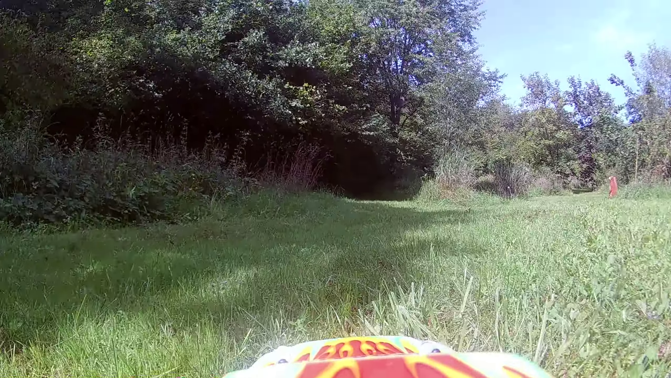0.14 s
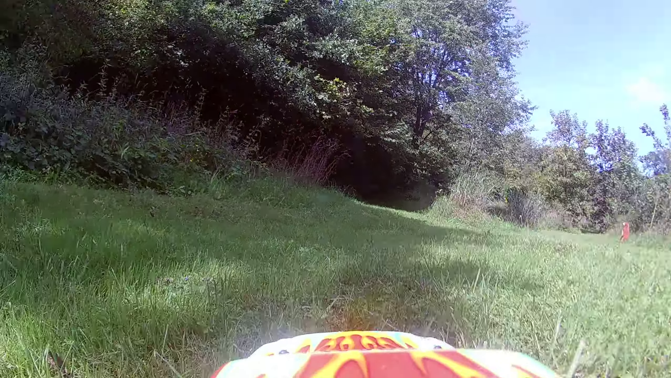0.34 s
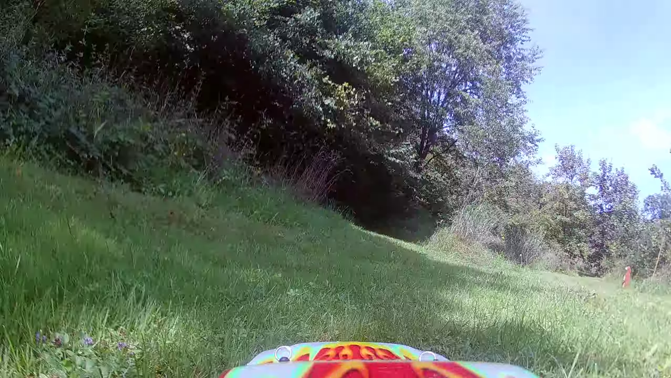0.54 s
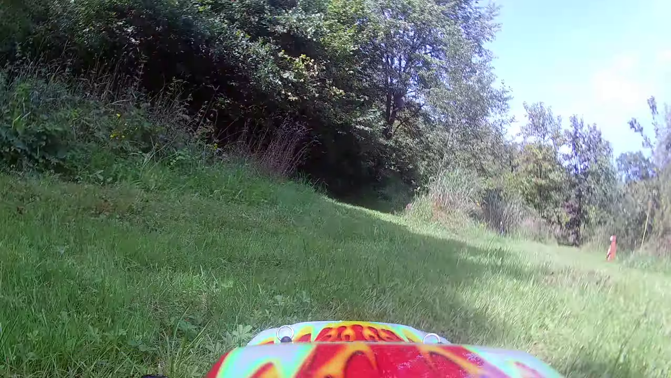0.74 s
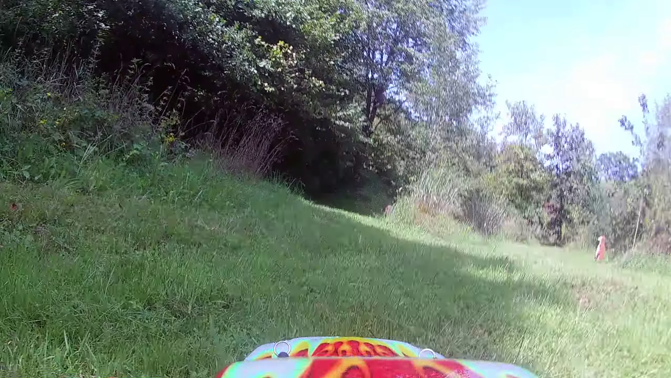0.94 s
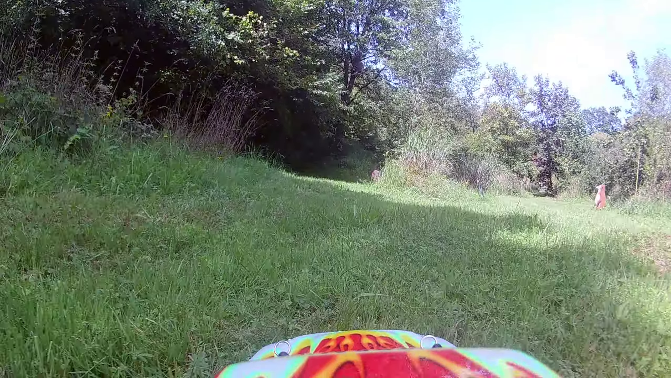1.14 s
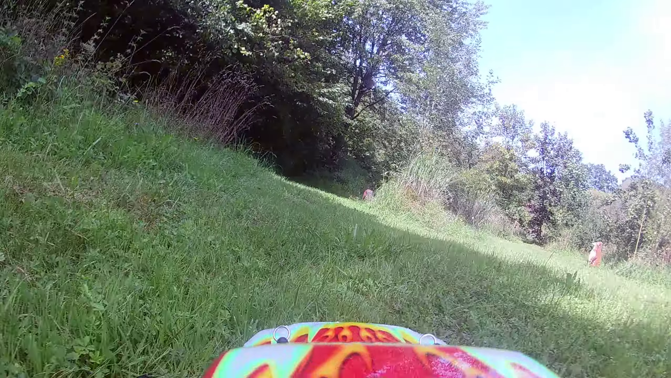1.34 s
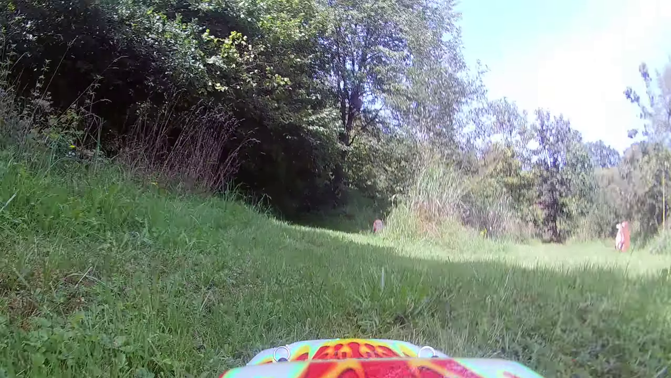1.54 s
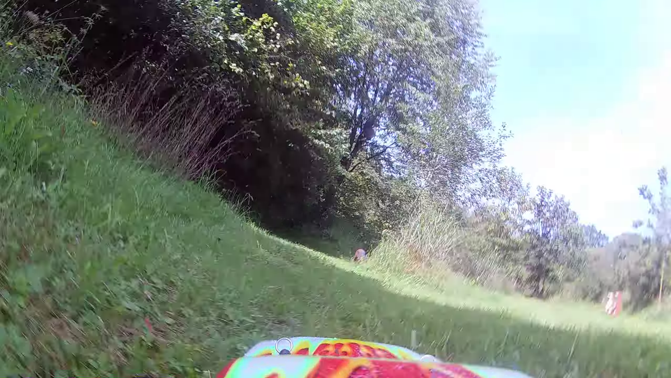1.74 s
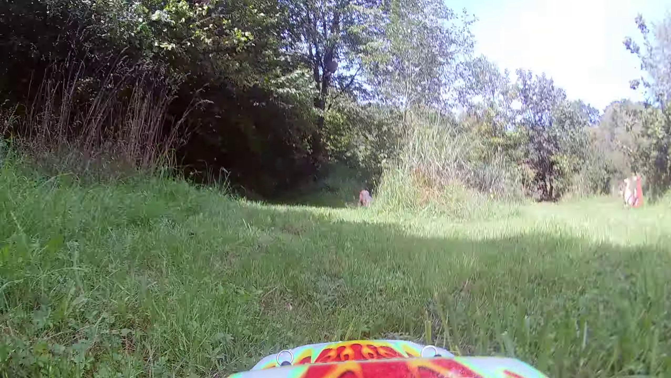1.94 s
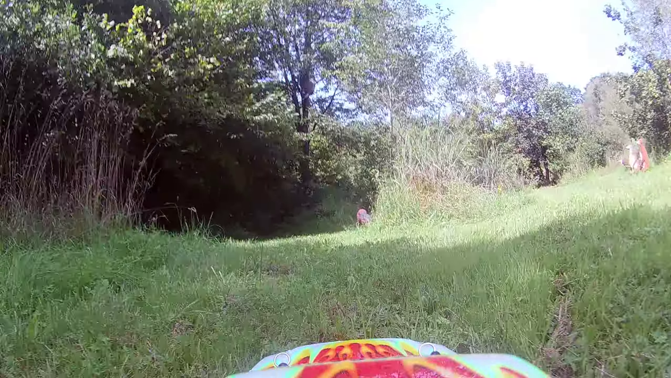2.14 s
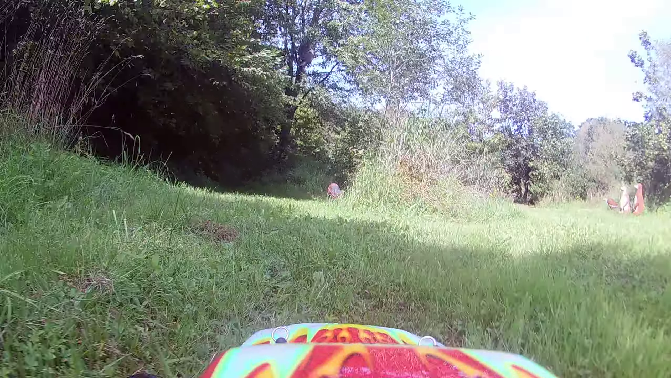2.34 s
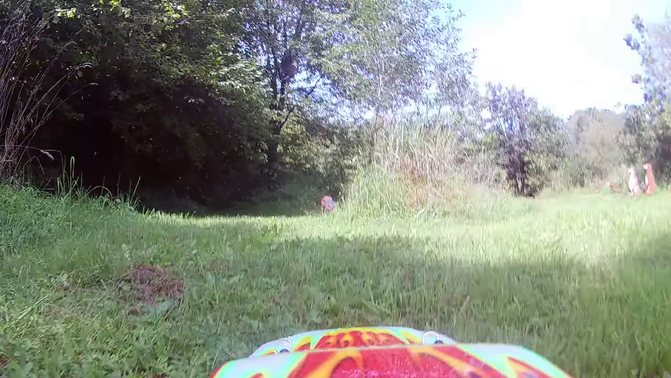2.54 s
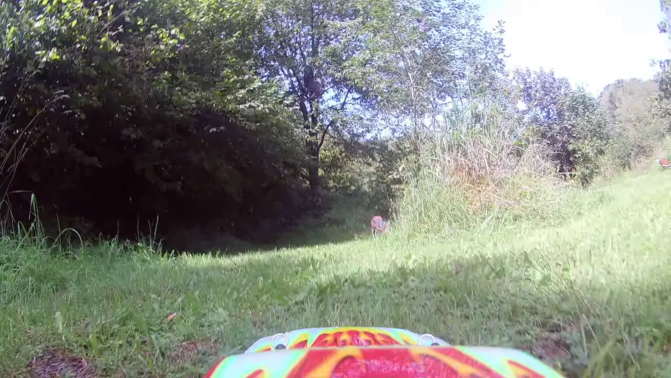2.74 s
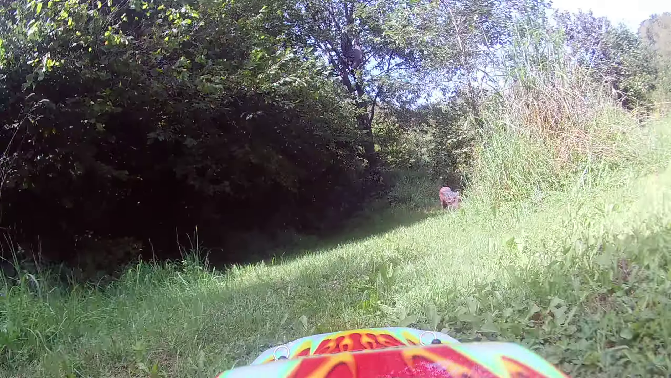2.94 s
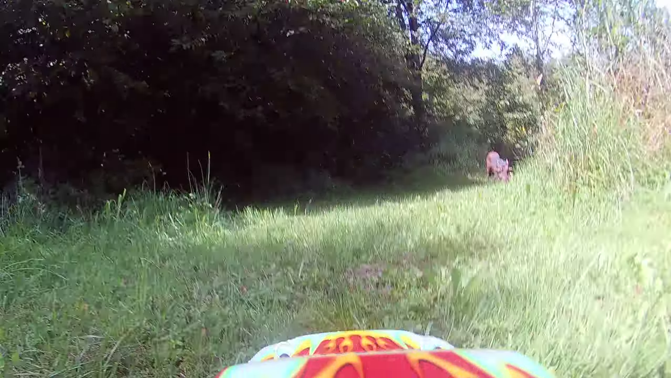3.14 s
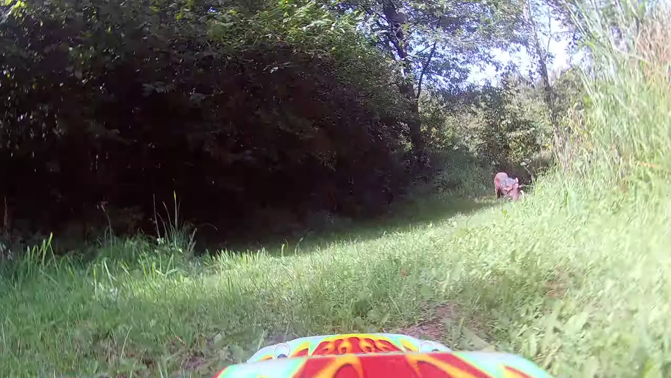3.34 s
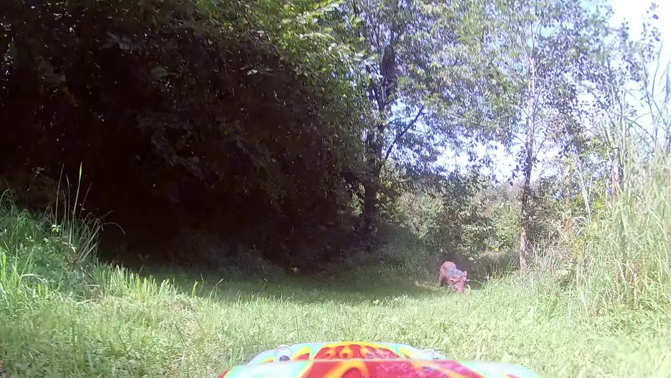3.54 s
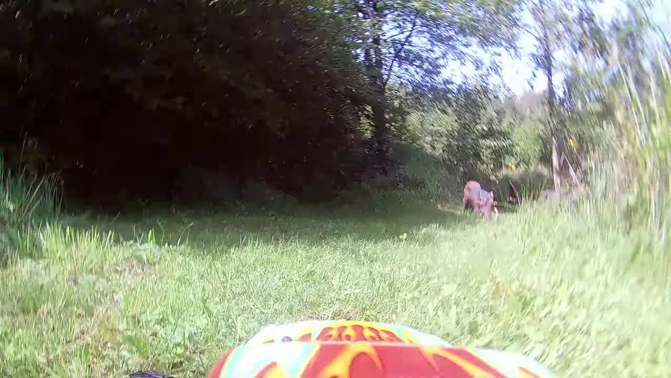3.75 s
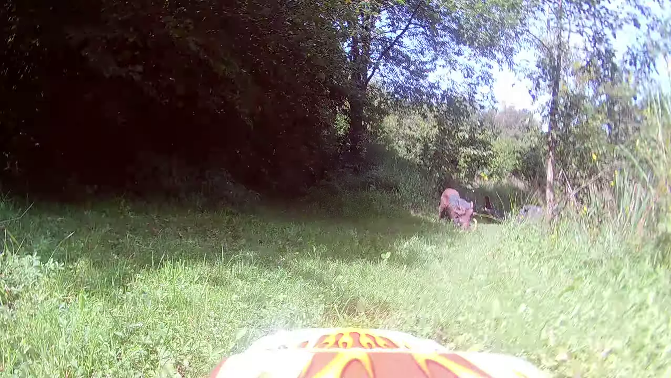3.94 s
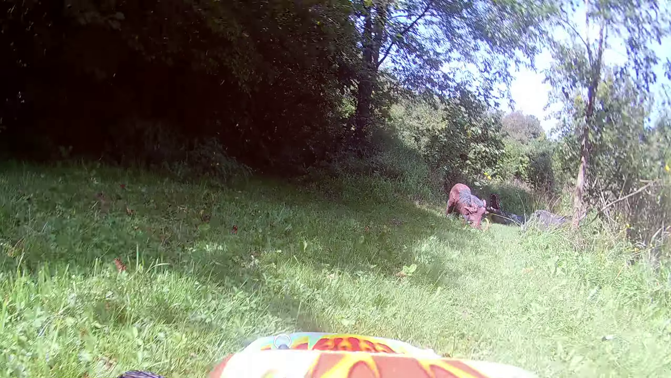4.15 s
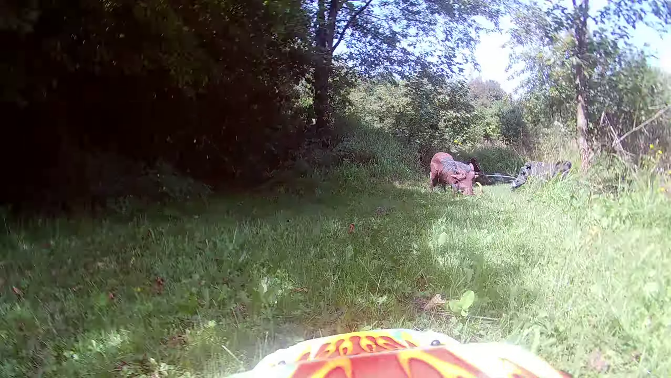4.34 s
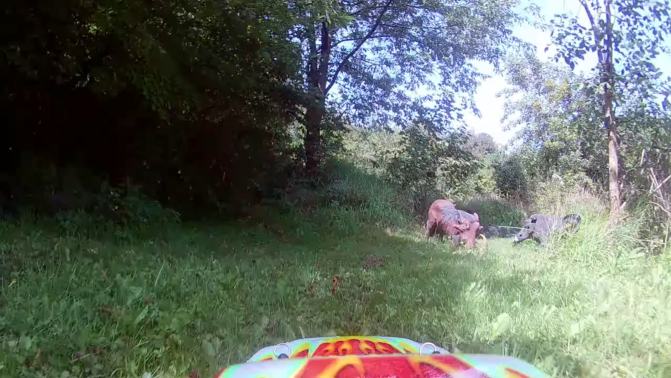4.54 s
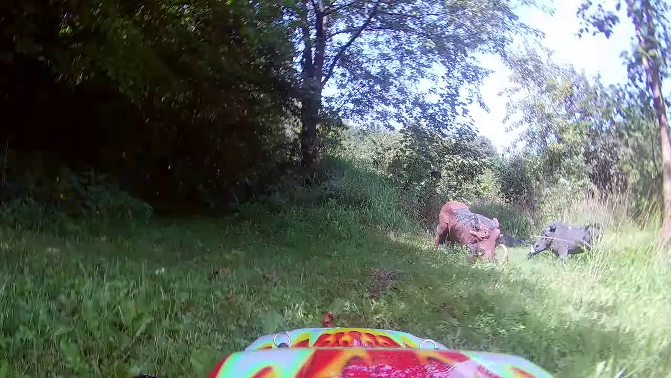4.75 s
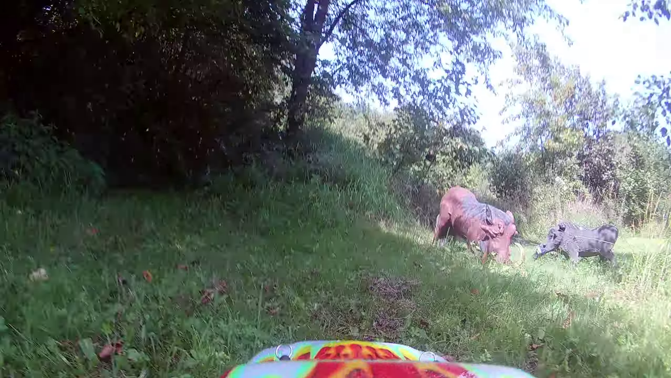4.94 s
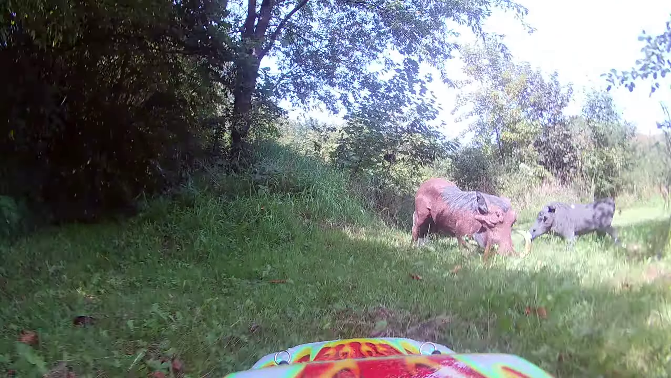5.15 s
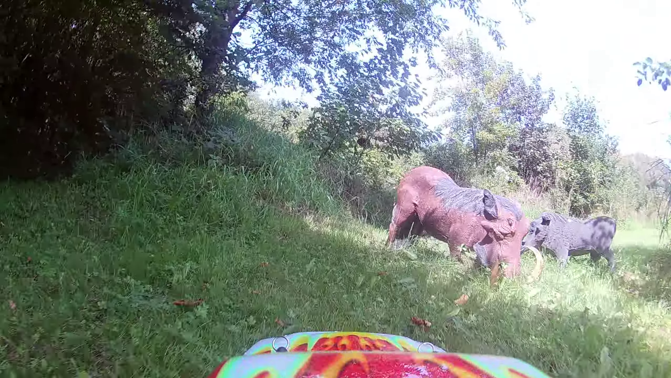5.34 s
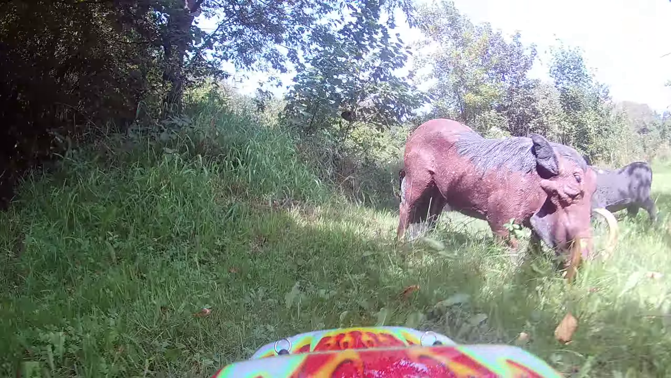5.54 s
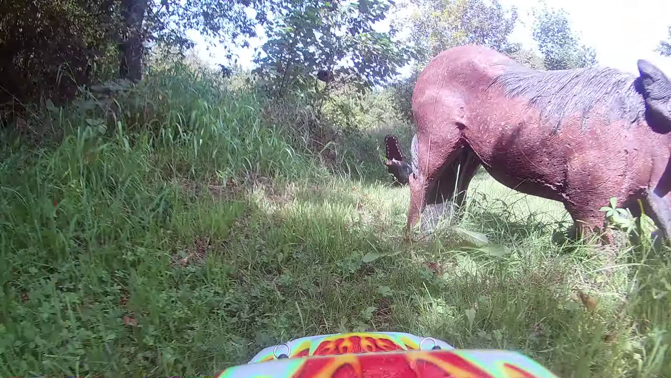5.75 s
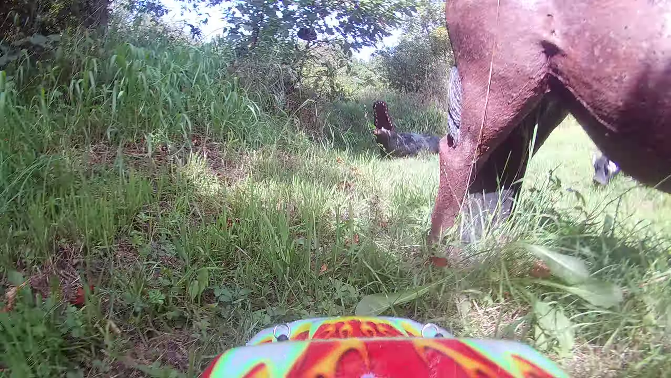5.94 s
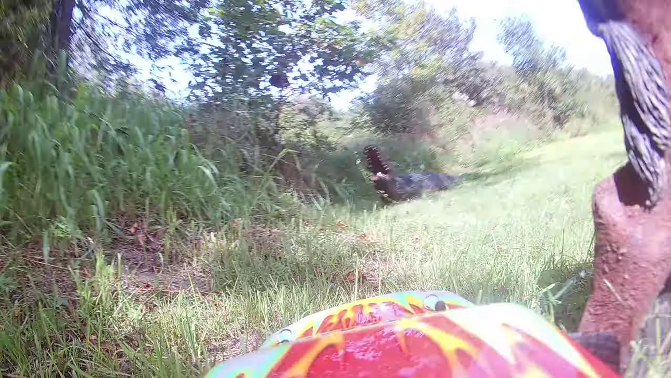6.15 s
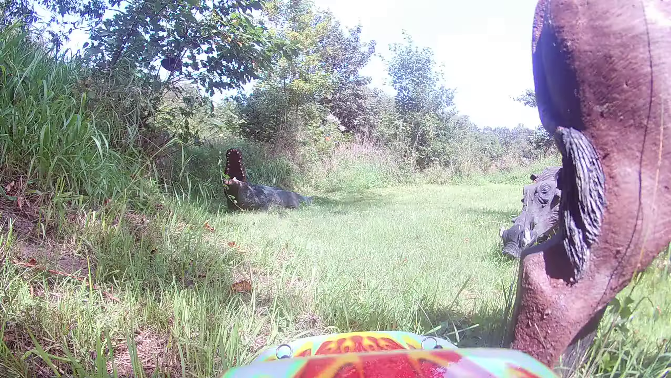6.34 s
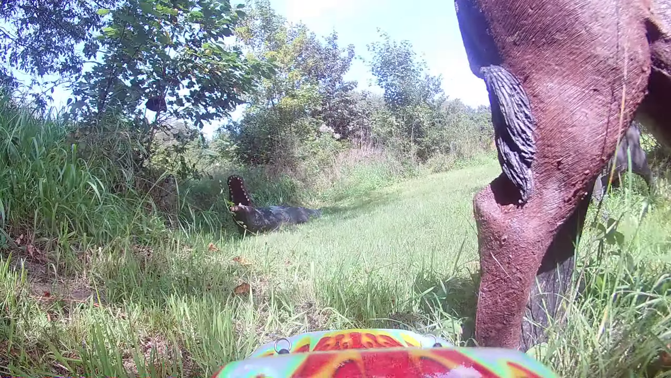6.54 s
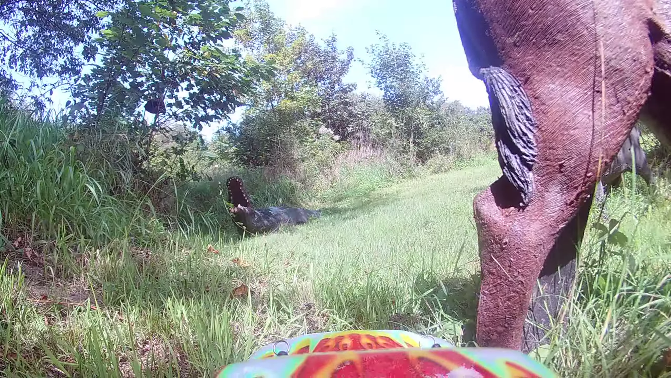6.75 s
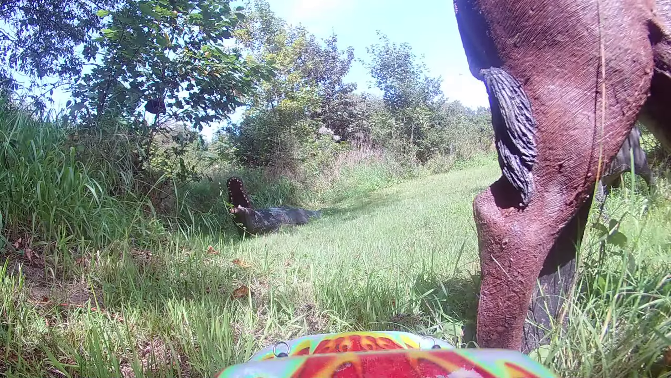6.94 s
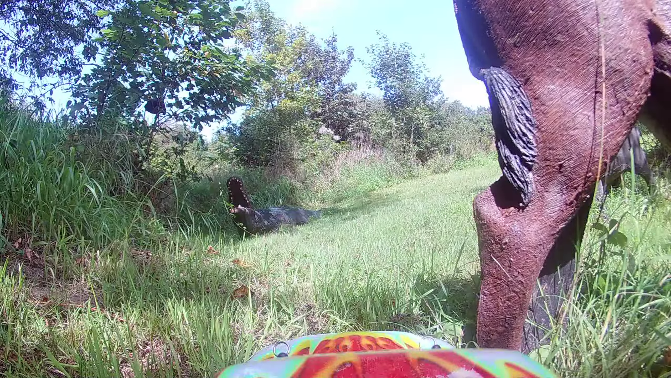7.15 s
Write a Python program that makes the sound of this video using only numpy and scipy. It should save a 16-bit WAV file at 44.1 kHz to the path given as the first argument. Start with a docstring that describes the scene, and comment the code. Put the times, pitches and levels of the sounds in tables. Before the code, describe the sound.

A toy truck bounces through long grass, its plastic shell knocking and crackling above pattering stems and whining gears, until it halts.

```python
"""Knocks on the plastic shell of a small radio-controlled truck lead as it drives through long grass and stops.
Each knock sums a flexing thud, a panel snap, a burst of overload crackle and ringing modes.
Grass stems patter and swish as random grains; bumps excite a damped chassis bounce.
The gears whine at their tooth rate, with faint high whistles and still air behind.
The highest peaks are rounded by overload, and the microphone's closed case cuts two dips in the treble."""
import sys
import numpy as np
from scipy import signal
from scipy.fft import rfft, irfft
from scipy.io import wavfile
from scipy.ndimage import uniform_filter1d

SR = 44100
rng = np.random.default_rng(int(sys.argv[2]) if len(sys.argv) > 2 else 0)


def master_out(mix):
    """Clip the mix to full scale and print it as 16-bit PCM to the path in sys.argv[1]."""
    frames = np.transpose(np.atleast_2d(mix))
    ceiling = np.clip(frames, -1, 1)
    pcm = np.round(ceiling * 32767).astype(np.int16)
    wavfile.write(sys.argv[1], SR, pcm)


N = 321914
TIME = np.arange(N) / SR
TAPS = 4096  # length of an impulse response or a blow, in samples
TAP_HZ = np.fft.rfftfreq(TAPS, 1 / SR)
TAP_TIME = np.arange(TAPS) / SR

# All table levels are relative: the functions add their own offsets.
# Single knocks on the shell, hard to faint: start_s [s], thud_db [dB], thud_hz [Hz], clack_db [dB]
KNOCKS = [(.069, -8, 685, -20), (.228, -11, 730, -7.5), (.258, -14, 640, -36), (0.381, -24, 700, -17.5),
          (.424, -0.5, 674, -2.5), (.518, -1, 738, -4), (.535, -6, 580, -14), (0.572, -12, 620, -25),
          (.593, -13.5, 570, -13.5), (.601, -3.5, 520, -7), (.705, -8.5, 740, -17.5), (.773, 2.5, 542, -3),
          (.854, -8, 705, -3), (.884, -13, 570, -9.5), (0.991, -8.5, 530, -10.5), (1.154, -15, 840, -17),
          (1.227, -8, 800, -8), (1.328, -3.5, 720, -7.5), (1.379, -11, 690, -17), (1.448, -9, 606, -19),
          (1.471, -12.5, 630, -29), (1.492, -11, 537, -5), (1.507, -7, 770, -14), (1.542, -3, 600, -1.5),
          (1.729, 2.5, 635, -2), (1.746, -1.5, 490, -13), (1.772, 5.5, 540, -7), (1.826, -21.5, 620, -6),
          (1.904, -9, 785, -20), (2.0, -7.5, 674, -13), (2.057, -12, 706, -17), (2.158, -13.5, 715, -8.5),
          (2.265, -13, 652, -11), (2.318, -12.5, 664, -1), (2.336, -0.5, 474, -7.5), (2.358, -3, 654, -33),
          (2.425, -9, 667, -15), (2.524, -9, 740, -18), (2.583, -6.5, 646, 2.5), (2.618, 0, 650, -1),
          (2.639, -15, 714, -8.5), (2.68, -10.5, 594, -6), (2.737, -10, 480, -7), (2.779, -6.5, 610, -1.5),
          (2.831, -13, 744, -10), (2.911, -18, 670, -9.5), (3.015, -10.5, 637, -10.5),
          (3.08, -6.5, 553, -9), (3.123, -3.5, 620, -5.5), (3.24, -5.5, 670, -8.5), (3.26, -5.5, 700, -10),
          (3.289, 1.5, 604, -1), (3.305, -5.5, 472, -11), (3.326, -10.5, 724, 0), (3.49, -8, 583, -39),
          (3.606, -11, 730, -19.5), (3.687, -3.5, 454, -10), (3.715, -18, 640, -5.5),
          (3.726, -12.5, 610, -7.5), (3.79, -10, 630, -3.5), (3.801, -1, 520, -8), (3.91, -6, 580, -9.5),
          (3.931, -25.5, 740, -8), (3.939, -9, 622, -5.5), (3.955, -13.5, 775, -21.5),
          (3.986, -7, 613, -8.5), (4.088, -9, 723, -9), (4.113, -10.5, 500, -8.5), (4.139, -9.5, 730, -1),
          (4.199, -8, 656, -5.5), (4.279, -11.5, 790, -16), (4.345, -8, 696, -5), (4.363, -6.5, 688, -12),
          (4.387, -5.5, 640, -0.5), (4.407, -8.5, 776, -15.5), (4.641, -18, 705, -11),
          (4.682, -8, 756, -17.5), (4.785, -7.5, 727, -2), (4.812, -4, 570, -21.5), (4.829, -7, 670, -2),
          (4.881, -14, 650, -10), (4.98, -9.5, 700, -22), (5.015, -7.5, 660, -5.5), (5.12, -8, 707, -3.5),
          (5.156, -9, 760, -10), (5.199, -11, 762, -13.5), (5.224, -4, 654, -5.5), (5.301, -8, 670, -11.5),
          (5.445, -1, 670, -1.5), (5.575, -6.5, 685, -7.5), (5.653, -13, 760, -14.5),
          (5.783, -11, 736, -22), (5.836, -22, 645, -19), (5.902, -6, 760, -9.5), (6.019, -8, 703, -10.5),
          (6.028, -19, 578, -8), (6.073, -13.5, 590, -10.5), (6.085, -9.5, 590, -18), (6.132, 2, 635, -8.5),
          (6.156, -12, 694, -23), (6.165, -6, 530, -7), (6.195, -18, 650, -22), (6.213, -9, 724, -4.5),
          (6.244, -8.5, 520, -21.5), (6.293, -9, 600, -10.5), (6.34, -5, 743, -9), (6.362, -13.5, 710, -14),
          (6.4, -18, 804, -17), (6.452, 1, 670, -5), (6.472, 3.5, 486, -9.5), (6.538, -25, 660, -14),
          (6.581, -9, 705, -10.5), (6.609, -39, 690, -25.5), (6.651, -25, 780, -25),
          (6.73, -29.5, 750, -46), (6.766, -28, 760, -31.5), (6.782, -29, 720, -53)]
# The ride through the grass: time_s [s], patter_db [dB], whine_db [dB], swish_db [dB], shaking_db [dB]
DRIVE = [(0, -36, -32, -64, -38), (.36, -30.5, -36, -67.5, -36.5), (.69, -26.5, -30, -56, -32.5),
         (1.25, -30, -30.5, -56.5, -37.5), (1.63, -26.5, -35.5, -54, -31),
         (2.2, -30.5, -26.5, -52.5, -35.5), (2.5, -30.5, -30.5, -51.5, -37),
         (2.73, -23, -30.5, -57.5, -29.5), (2.95, -29, -31, -51.5, -32.5), (3.4, -25, -31.5, -55, -30.5),
         (3.94, -26.5, -32, -54, -28.5), (4.55, -30, -26.5, -54, -33), (4.84, -24.5, -35, -49, -31),
         (5.23, -31, -32, -55.5, -37), (5.55, -26, -25, -54, -35), (5.68, -34.5, -60, -64, -35.5),
         (5.93, -31.5, -35.5, -53, -41), (6.04, -21.5, -29.5, -46.5, -33), (6.2, -29, -47.5, -62, -27.5),
         (6.28, -39, -54.5, -74, -36), (6.52, -33, -44.5, -78.5, -31), (6.64, -58.5, -52, -91.5, -49.5),
         (6.9, -72, -77, -90, -70)]
# Road speed as the tooth rate of the gears: time_s [s], tooth_rate_hz [Hz]
TOOTH_RATE = [(0, 964), (.3, 1008), (.7, 1371), (1.1, 1255), (1.4, 1384), (2.2, 1538), (2.9, 1430),
              (3.3, 1516), (4.2, 1453), (4.9, 1588), (5.3, 1489), (5.58, 1580), (5.8, 1320), (6.05, 1526),
              (6.2, 1460), (6.6, 588)]
# Spectrum of a snapping panel: frequency_hz [Hz], level_db [dB per Hz]
CLACK_SPECTRUM = [(200, -19), (700, -7.5), (1100, 7), (1850, 6), (2150, -3.5), (2700, -7), (3050, -26.5),
                  (3900, -21), (5000, -30), (7000, -40.5), (12000, -59), (16000, -61)]
# Treble spectrum of swishing stems and of overload crackle: frequency_hz [Hz], level_db [dB per Hz]
SWISH_SPECTRUM = [(1200, -18), (2400, 14.5), (3200, -4), (3900, 0), (4800, -15.5), (5600, -1), (6300, -20),
                  (7100, -9.5), (9000, -28), (10500, -28.5), (13000, -26), (14200, -26.5), (16000, -32)]

CHANCE_END_S = 5.5  # random light knocks and ruts end here
CRACKLE_LEAD_S = .03  # the crackle swells from this long before a blow


def amp(db):
    """Level law: decibels to amplitude gain."""
    return 10 ** (np.asarray(db) / 20)


def unit(x):
    """Power normalization: scales to rms 1."""
    return x / np.sqrt(np.mean(x ** 2) + 1e-20)


def unit_peak(x):
    """Peak normalization: scales to peak magnitude 1."""
    return x / abs(x).max()


def curve(table, axis=1):
    """Linear interpolation of one table column over time."""
    columns = np.transpose(table)
    return np.interp(TIME, columns[0], columns[axis])


def spectrum_db(points, hz):
    """Interpolates a spectrum in decibels on a logarithmic frequency axis."""
    f, db = np.transpose(points)
    return np.interp(np.log(hz + 1), np.log(f + 1), db)


def noise(points, size=N):
    """Spectral shaping: white noise filtered to the given spectrum, at rms 1."""
    white = rfft(rng.standard_normal(size))
    gain = amp(spectrum_db(points, np.fft.rfftfreq(size, 1 / SR)))
    return unit(irfft(white * gain, size))


def wander(per_s):
    """Gaussian low-pass noise of rms 1, varying at rates up to about per_s [Hz]."""
    white = rfft(rng.standard_normal(N))
    lowpass = np.exp(-(np.fft.rfftfreq(N, 1 / SR) / per_s) ** 2)
    return unit(irfft(white * lowpass, N))


def ripple(size):
    """Modal variation: random peaks and dips over frequency, as each spot on the shell favours other modes."""
    smoothed = uniform_filter1d(rng.standard_normal(len(TAP_HZ)), size)
    return unit(uniform_filter1d(smoothed, size))


def response(db):
    """Minimum phase: the causal impulse response with this gain over TAP_HZ."""
    log_gain = np.log(amp(np.r_[db, db[-2:0:-1]]))
    # the phase is the Hilbert transform of the log gain
    return irfft(np.exp(signal.hilbert(log_gain).conj())[:len(db)])


def add(mix, s, sound):
    """Superposition: mixes a sound in at time s, trimming what lies outside."""
    start = round(s * SR)
    sound = sound[max(-start, 0):]
    part = mix[max(start, 0):][:len(sound)]
    part += sound[:len(part)]


def grains(points, per_s, spread_db, ripple_db, count=12):
    """Granular excitation: random taps of uneven size ring several spots of the shell, at rms 1."""
    size = amp(spread_db * np.minimum(rng.exponential(1, N), 3)) * rng.choice([-1, 1], N)
    taps = size * (rng.random(N) < per_s / SR)
    spot = rng.integers(0, count, N)
    colour = spectrum_db(points, TAP_HZ)
    out = np.zeros(N)
    for k in range(count):
        spot_response = response(colour + ripple_db * ripple(size=14))
        out += signal.oaconvolve(taps * (spot == k), spot_response)[:N]
    return unit(out)


def fuzzy_tone(hz, width_hz):
    """Narrow-band noise: a carrier of rms 1 whose level and phase vary at random."""
    phase = 2 * np.pi * np.cumsum(hz * np.ones(N)) / SR
    return wander(per_s=width_hz) * np.cos(phase) + wander(per_s=width_hz) * np.sin(phase)


def chance_times(per_s, count=256):
    """Random renewal process: unevenly spaced moments up to CHANCE_END_S."""
    times = np.cumsum(rng.uniform(.2, 1.8, count)) / per_s
    return times[times < CHANCE_END_S]


def knocks(thud_db=-1.3, clack_db=0.04, ring_db=-19, scuff_db=-9, chatter_db=-9, chatter_s=0.0061):
    """Impact excitation: a blow scuffs, clacks, thuds and crackles; the shell then shivers, rings and chatters once."""
    # diffuse shiver of the shell: frequency_hz [Hz], level_db [dB per Hz]
    ring_spectrum = [(150, -13), (300, -5), (430, 31.5), (750, 18), (1000, 3.5), (1800, -38.5),
                     (2200, -34.5), (3100, -41.5), (7000, -57.5), (15000, -68)]
    rise_cycles = 0.92  # a deeper thud builds up more slowly
    panel_hz, panel_scatter = 1533, 0.063  # panel resonance and its log-frequency spread from blow to blow
    out = np.zeros(N)
    spreading = 1 - np.exp(-TAP_TIME / .002)
    shiver = amp(-60 * TAP_TIME / .065)  # falls by 60 dB in 65 ms
    for s, low_db, low_hz, high_db in KNOCKS + light_knocks():
        rise_s = rise_cycles / low_hz
        high_hz = panel_hz * np.exp(panel_scatter * rng.standard_normal())
        low, high = amp(low_db + thud_db), amp(high_db + clack_db)
        force = np.hypot(low, high)
        panel = clack(high_hz)
        scrape = signal.fftconvolve(scuff(length_s=.006), panel)
        add(out, s - TAPS / SR, low * amp(scuff_db) * rng.uniform(0.17, 1) * scrape)
        add(out, s, low * thud(rise_s, low_hz) - high * panel)
        add(out, s - CRACKLE_LEAD_S, overload_crackle(force))
        ringing = amp(ring_db) * shiver * noise(ring_spectrum, size=TAPS) + shell_modes()
        add(out, s, force * spreading * ringing)
        # a weaker second contact within milliseconds gives each blow its own hollow colour
        rebound = low * thud(rise_s, low_hz * rng.uniform(0.69, 1.05)) / 2
        rebound = rebound + force * clack(high_hz * rng.uniform(0.29, 1.3))
        add(out, s + chatter_s * rng.uniform(0.18, 1.5), amp(chatter_db) * rng.random() * rebound)
    return out


def light_knocks(count=256):
    """Random impacts: stalks and small debris as rows like KNOCKS, stronger where the grass patters louder."""
    per_s, pitch_hz, pitch_scatter = 14, 670, .12
    thud_over_db, clack_over_db, spread_db = 12.5, 9.5, 4  # over the tabled patter
    thud_luck, clack_luck, pitch_luck = np.clip(rng.standard_normal((3, count)), -2, 2)
    grass_db = curve(DRIVE, axis=1)
    rows = []
    for s, a, b, c in zip(chance_times(per_s), thud_luck, clack_luck, pitch_luck):
        base_db = grass_db[int(s * SR)]
        low_db = base_db + thud_over_db + spread_db * a
        high_db = base_db + clack_over_db + spread_db * b
        rows.append((s, low_db, pitch_hz * np.exp(pitch_scatter * c), high_db))
    return rows


def thud(rise_s, hz):
    """Damped flexure: the whole shell bends for a few cycles, its pitch sagging as the contact lets go."""
    u = TAP_TIME / max(rise_s, 1e-4)
    # from 15 % above the nominal pitch towards 15 % below
    turns = np.cumsum(hz * (1 + .15 * (2 * np.exp(-u / 2) - 1))) / SR
    return u * np.exp(1 - u) * np.sin(2 * np.pi * turns)


def clack(hz, width_hz=340, lift_db=8.0, ripple_db=4.5):
    """Resonant impulse response: the struck panel snaps with a broad resonance; envelope peak 1."""
    resonance_db = lift_db / (1 + ((TAP_HZ - hz) / width_hz) ** 2)
    snap = response(spectrum_db(CLACK_SPECTRUM, TAP_HZ) + resonance_db + ripple_db * ripple(size=12))
    return snap / abs(signal.hilbert(snap)).max()


def scuff(length_s=.02):
    """Stick-slip friction: a stalk scrapes ever harder until it lets go, a swell of tiny slips of energy 1."""
    slips = np.exp((TAP_TIME - TAP_TIME[-1]) / length_s) * rng.standard_normal(TAPS)
    return slips / np.linalg.norm(slips)


def overload_crackle(force, crackle_db=-34, hardness=1.7, build_s=.0033, fade_s=.002):
    """Nonlinear overload: a burst of rough treble swells and fades around a blow, far stronger under a hard one."""
    crackle = noise(SWISH_SPECTRUM, size=TAPS) * rng.exponential(1, TAPS // 32).repeat(32)
    softened = signal.lfilter([.25, .5, .25], [1], crackle)
    t = TAP_TIME - CRACKLE_LEAD_S
    envelope = np.exp(np.minimum(t / build_s, -t / fade_s))
    return force ** hardness * amp(crackle_db) * envelope * softened


def shell_modes(spread_db=2, detune=0.02):
    """Modal decay: the shell's lasting modes, mixed and bent a little differently by each blow."""
    # pitch_hz [Hz], level_db [dB relative to the blow], t60_s [s]
    modes = [(464, -25, 0.047), (575.7, -17, .09), (720, -30.5, 0.45), (1090, -32, 0.017),
             (1920, -34.5, 0.064), (2790, -42, 0.017)]
    out = np.zeros(TAPS)
    for hz, db, t60 in modes:
        decay = amp(db + spread_db * rng.standard_normal() - 60 * TAP_TIME / t60)
        bent_hz = hz * (1 + detune * rng.standard_normal())
        out += decay * np.sin(2 * np.pi * bent_hz * TAP_TIME)
    return out


def grass(patter_db=0.5, tick_db=-6, swish_db=2, clump_db=3.0, snap_db=-1):
    """Clustered micro-impacts: stems patter and swish in tufts; stiff ones tick and dry ones snap."""
    # soft stem taps: frequency_hz [Hz], level_db [dB per Hz]
    patter_spectrum = [(80, -21.5), (190, -1.5), (290, -3), (420, 6.5), (600, -2.5), (780, 2.5),
                       (1020, -10.5), (1700, -10.5), (2100, -17), (2750, -31), (3200, -34.5), (6000, -58)]
    tufts = unit(amp(clump_db * wander(per_s=47))) * stirred()
    ticks = grains(CLACK_SPECTRUM, per_s=60, spread_db=4, ripple_db=4, count=10)
    patter = grains(patter_spectrum, per_s=800, spread_db=3, ripple_db=5.5) + amp(tick_db) * ticks
    swish = amp(swish_db) * grains(SWISH_SPECTRUM, per_s=3200, spread_db=0.5, ripple_db=8.5)
    snaps = amp(snap_db) * grains(SWISH_SPECTRUM, per_s=45, spread_db=8.0, ripple_db=5.0, count=8)
    patter_level = amp(curve(DRIVE, axis=1) + patter_db)
    swish_level = amp(curve(DRIVE, axis=3))
    return tufts * (patter_level * patter + swish_level * (swish + snaps))


def stirred():
    """Energy relaxation: each listed knock lifts the grass gain by its strength, and the lift decays exponentially."""
    rustle_db, settle_s = 2.5, 0.026  # the gain scales the knock energy
    kicks = np.zeros(N)
    for s, thud_db, _, clack_db in KNOCKS:
        kicks[round(s * SR)] = amp(thud_db) ** 2 + amp(clack_db) ** 2
    energy = signal.lfilter([1], [1, -np.exp(-1 / (settle_s * SR))], kicks)
    return np.sqrt(1 + amp(rustle_db) * energy)


def chassis(rumble_db=4.0, thump_db=-4.0, rise_s=0.002, t60=0.12):
    """Damped oscillation: bumps set the sprung chassis booming; rough ground keeps it rumbling between."""
    # steady shaking: frequency_hz [Hz], level_db [dB per Hz]
    rumble_spectrum = [(10, -18), (25, -7.5), (55, -13), (75, -6.5), (98, 0.5), (130, -5), (185, -7),
                       (280, -11.5), (600, -82)]
    # wheels hitting the big bumps: start_s [s], level_db [dB]
    thumps = [(0.419, -12), (0.512, -17.5), (0.593, -10.5), (.763, -8), (0.879, -8), (0.978, -9),
              (1.376, -12), (1.468, -9), (1.768, -6), (1.9, -11.5), (2.375, -10.5), (2.607, -9.5),
              (2.684, -12), (2.812, -15.5), (3.337, -4.5), (3.478, -9), (3.593, -10), (3.798, -9.5),
              (4.061, -10), (4.285, -10), (4.758, -8.5), (4.98, -7.5), (5.198, -10.5), (5.302, -10.5),
              (5.476, -11), (5.954, -15), (6.234, -11.5), (6.539, -12)]
    bounce_hz, bounce_scatter = 104.1, .04
    ruts_per_s, rut_db, rut_hz = 4.7, 10.5, 118  # small random bumps, relative to the tabled shaking
    jolt_db, jolt_delay_s = -18, .012  # every listed knock jolts the chassis, by the strength of its thud
    shaking_db = curve(DRIVE, axis=4)
    out = amp(shaking_db + rumble_db) * noise(rumble_spectrum)
    t = np.arange(2 * TAPS) / SR
    bounce = unit_peak((1 - np.exp(-t / rise_s)) * amp(-60 * t / t60))
    ruts = [(s, shaking_db[int(s * SR)] + rut_db, rut_hz) for s in chance_times(ruts_per_s)]
    jolts = [(s + jolt_delay_s, db + jolt_db, rut_hz) for s, db, _, _ in KNOCKS]
    bumps = [(s, db, bounce_hz) for s, db in thumps] + jolts + ruts
    for (s, db, hz), luck in zip(bumps, rng.standard_normal(size=256)):
        tone = np.sin(2 * np.pi * hz * (1 + bounce_scatter * luck) * t)
        add(out, s, amp(db + thump_db) * bounce * tone)
    return out


def gears(level_db=5.0, jitter=.035, width_hz=110, flutter_db=3, surge_db=0.7, rough=0.94,
          body_hz=1520, body_width_hz=260, off_body_db=-7):
    """Tooth-mesh excitation: a whine roughened by the changing load swells at a resonance of the body."""
    shaken_hz = curve(TOOTH_RATE) * (1 + jitter * wander(per_s=61))
    nearness = 1 / (1 + ((shaken_hz - body_hz) / body_width_hz) ** 2)
    body = amp(off_body_db * (2 - nearness))
    clean = np.sqrt(2) * np.sin(2 * np.pi * np.cumsum(shaken_hz) / SR)
    # rough is the share of power in the fuzzy tone
    mesh = np.sqrt(1 - rough) * clean + np.sqrt(rough) * fuzzy_tone(shaken_hz, width_hz)
    load_db = flutter_db * wander(per_s=54) + surge_db * wander(per_s=7.5)
    return amp(curve(DRIVE, axis=2) + level_db + load_db) * body * mesh


def gearbox(jitter=.018, case_hz=3950, case_width_hz=300, blur_hz=170, off_case=0.16, case_db=-62, rush_db=-41):
    """Resonant coupling: under throttle the drive rushes and its case rings, lifting whine overtones that pass near."""
    # rush of the spinning motor and gears: frequency_hz [Hz], level_db [dB per Hz]
    rush_spectrum = [(700, -14), (1400, -2), (1950, 1), (2300, -7.5), (2750, -10.5), (3050, -22),
                     (5000, -32.5), (12000, -53.5)]
    # overtones of the whine: multiple [of the tooth rate], level_db [dB]
    overtones = [(2, -56), (3, -61)]
    # throttle: time_s [s], share [amplitude factor]
    throttle = [(0, .75), (.6, 1), (5.55, 1), (5.7, .1), (5.9, .2), (6.05, .8), (6.25, 0)]
    tooth_hz = curve(TOOTH_RATE) * (1 + jitter * wander(per_s=44))
    out = amp(rush_db) * noise(rush_spectrum) + amp(case_db) * fuzzy_tone(case_hz, case_width_hz)
    for k, db in overtones:
        coupling = off_case + 1 / (1 + ((k * tooth_hz - case_hz) / case_width_hz) ** 2)
        out += amp(db) * fuzzy_tone(k * tooth_hz, blur_hz) * coupling
    return curve(throttle) * out


def squeaks(level_db=7.5, rasp_db=4):
    """Stick-slip oscillation: stems sliding on the plastic give short, unsteady gliding tones."""
    # start_s [s], length_s [s], level_db [dB], start_hz [Hz], end_hz [Hz]
    slides = [(0.437, 0.029, -24.5, 2420, 1740), (1.018, 0.011, -32.5, 2240, 2320),
              (4, 0.0094, -30, 2140, 2110), (4.895, 0.015, -31, 2130, 2120)]
    out = np.zeros(N)
    slip = 1 + .06 * wander(per_s=300)
    for s, length, db, start_hz, end_hz in slides:
        u = np.clip((TIME - s) / length, 0, 1)
        pitch_hz = (start_hz + (end_hz - start_hz) * u) * slip
        tone = np.sin(2 * np.pi * np.cumsum(pitch_hz) / SR)
        out += amp(db + level_db) * np.sin(np.pi * u) * tone
    return out * unit(amp(rasp_db * wander(per_s=350)))


def controller(width_hz=90):
    """Narrow-band radiation: the speed controller gives faint, very high whistles in short bursts."""
    # bursts: start_s [s], length_s [s], level_db [dB]
    bursts = [(0.735, .06, -73), (.89, .12, -71), (2.12, 0.067, -70), (2.455, .05, -77), (3.1, .11, -74),
              (3.42, .1, -76), (3.548, .08, -66), (3.844, 0.067, -66), (5.664, 0.23, -75),
              (5.888, .08, -78)]
    # tones: pitch_hz [Hz], level_db [dB]
    whistle_tones = [(10250, -4.5), (14080, -4.5)]
    level = np.zeros(N)
    for s, length, db in bursts:
        level += amp(db) * np.sin(np.pi * np.clip((TIME - s) / length, 0, 1))
    return level * sum(amp(db) * fuzzy_tone(hz, width_hz) for hz, db in whistle_tones)


def scene(air_db=-61):
    """Superposition: knocks, squeaks and whistles join rolling sounds that fade at the end, over still air."""
    # still air: frequency_hz [Hz], level_db [dB per Hz]
    air_spectrum = [(15, -15), (30, -11.5), (70, -1), (230, -19.5), (700, -26.5), (1200, -27), (1900, -35),
                    (4000, -40.5), (15000, -45)]
    moving = np.interp(TIME, [6.78, 6.92], [1, 0])
    air = amp(air_db) * noise(air_spectrum)
    rolling = moving * (grass() + gears() + gearbox() + chassis())
    return (air + rolling + squeaks() + controller() + knocks())[None]


def record(dry, knee=12.0):
    """Saturation and filtering: overload rounds peaks, the case cuts treble dips, hiss joins and the band is limited."""
    # dips of the closed case: center_hz [Hz], half_width_hz [Hz], depth_db [dB]
    case_dips = [(7890, 360, 15), (13350, 590, 14.5)]
    hiss_db = -82.5  # white-noise rms ahead of the band limits
    limited = dry / (1 + abs(dry) ** knee) ** (1 / knee)
    cut_db = sum(depth_db / (1 + ((TAP_HZ - hz) / width) ** 2) for hz, width, depth_db in case_dips)
    case = response(-cut_db)
    coloured = signal.oaconvolve(limited, case[None])[:, :N] + amp(hiss_db) * rng.standard_normal(N)
    coloured = signal.sosfilt(signal.butter(1, 8, "high", fs=SR, output="sos"), coloured)
    lowpass = signal.firwin(511, 16000, window=("kaiser", 9), fs=SR)
    return signal.oaconvolve(coloured, lowpass[None], "same")


dry = scene()
out = record(dry)
master_out(out)
```